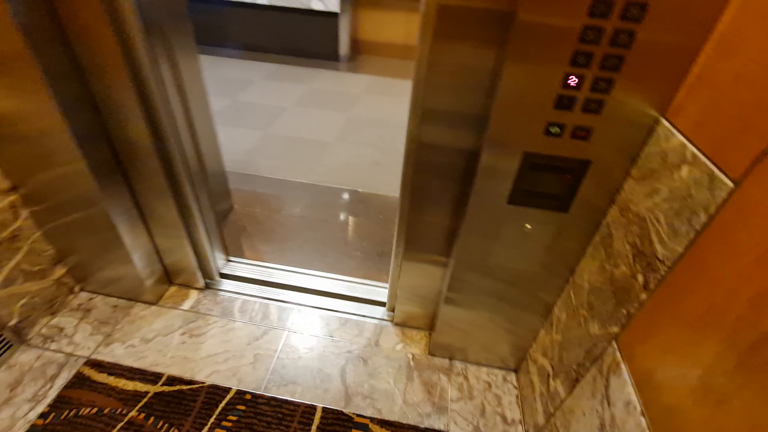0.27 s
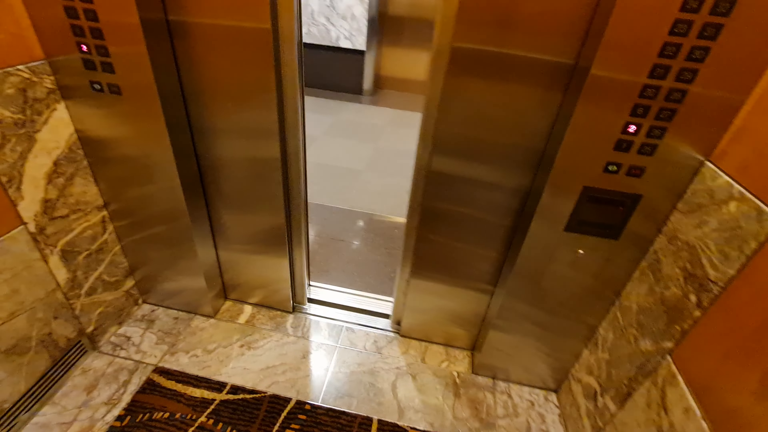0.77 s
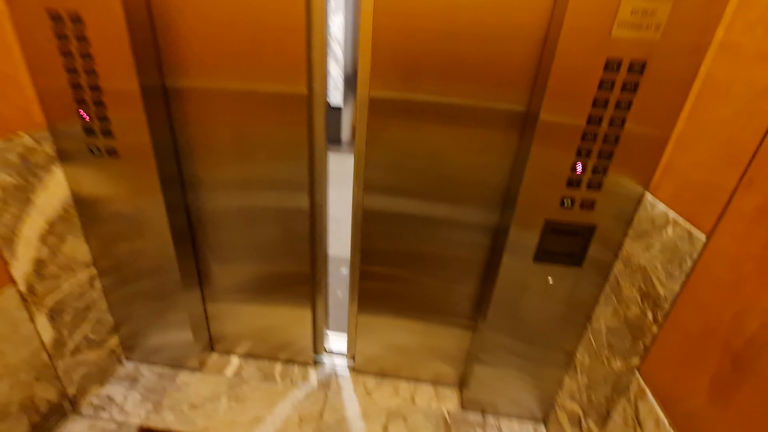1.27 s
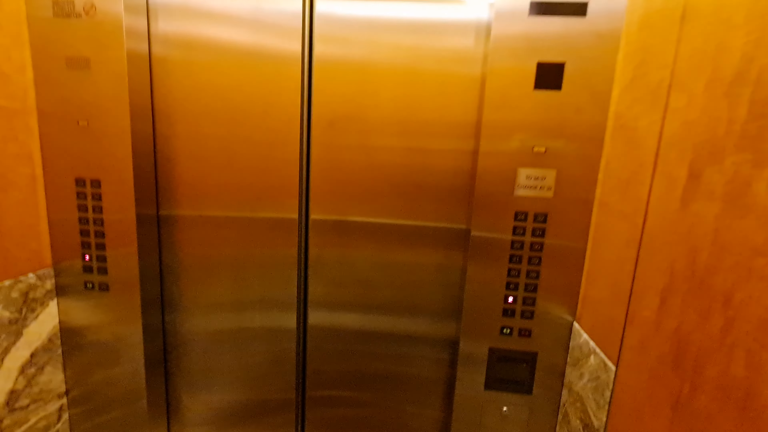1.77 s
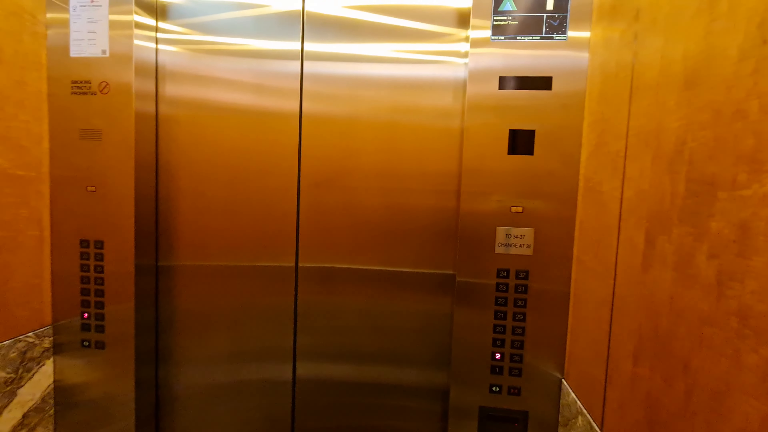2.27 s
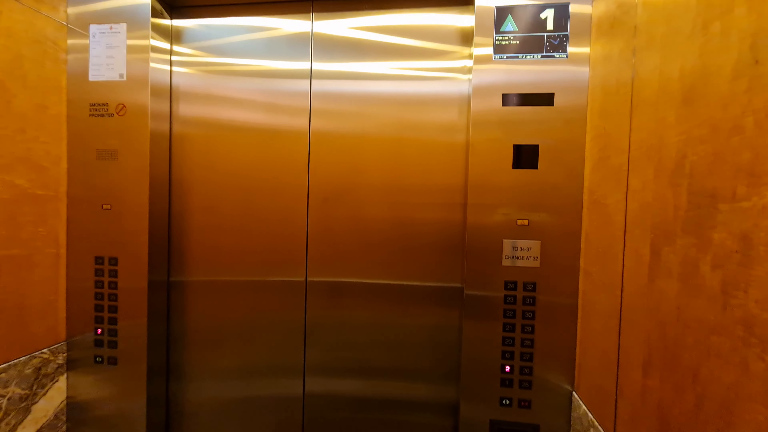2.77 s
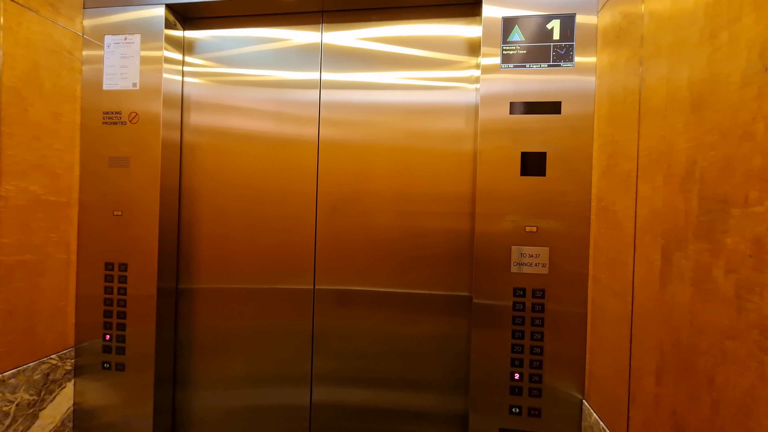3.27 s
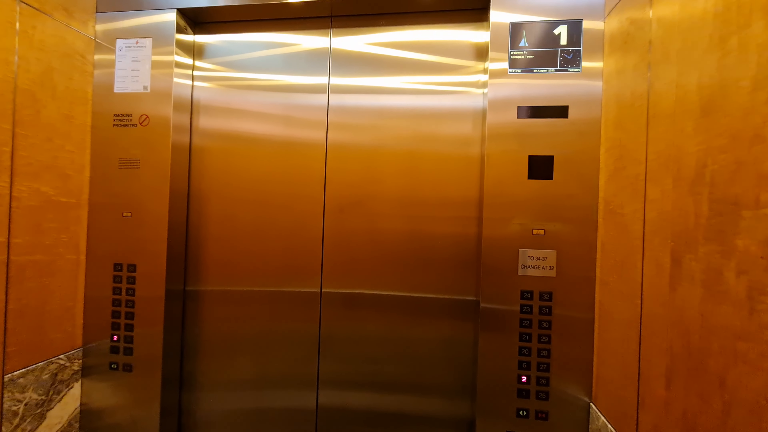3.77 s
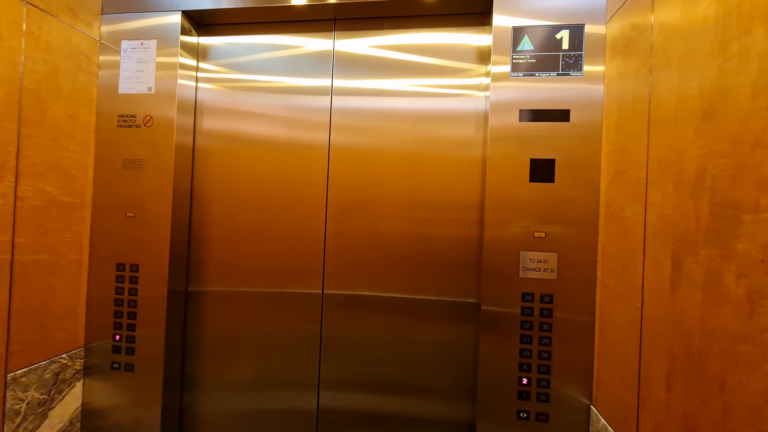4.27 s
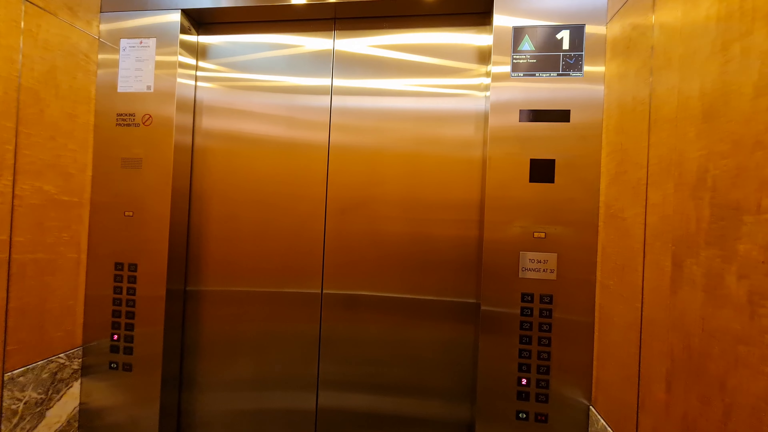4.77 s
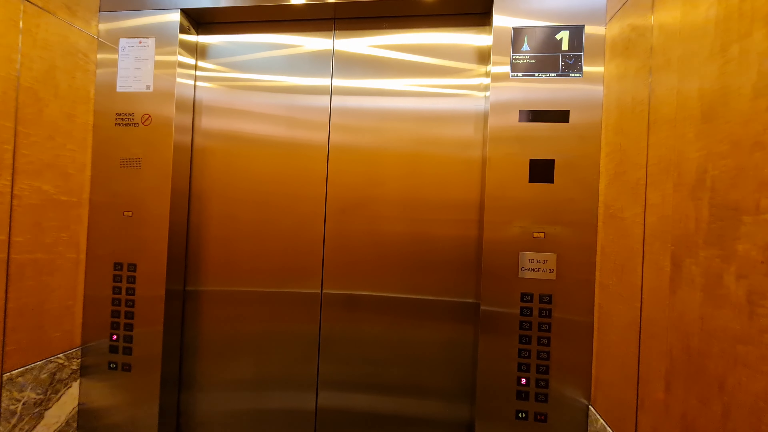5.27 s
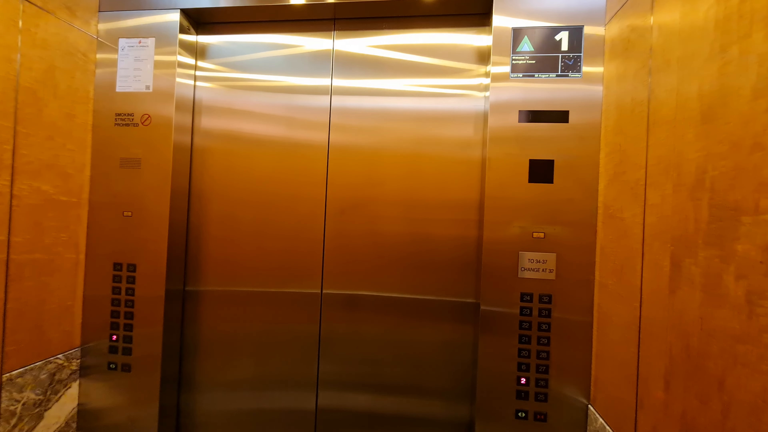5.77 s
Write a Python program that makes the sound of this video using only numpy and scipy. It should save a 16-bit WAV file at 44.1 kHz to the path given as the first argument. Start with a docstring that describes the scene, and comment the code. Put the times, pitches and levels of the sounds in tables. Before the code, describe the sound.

Inside an elevator car, steel doors roll and scrape shut with groans and a sharp tick, over a deep steady hum and airy rumble.

```python
"""Inside an elevator car: the steel doors slide shut and the car sets off, under a deep mains hum and the rush of air.
Sines make the hum, the motor whine and the inverter whistle; shaped noise makes the rumble, air, hiss and thudding.
The door rollers rumble and the panels scrape, groan and squeak, above the low drone of the door drive.
Soft noise swells brush close by, and a few short pushes tick. Late on, the drive adds a faint whine."""
import sys
import numpy as np
from scipy.fft import rfft, irfft, next_fast_len
from scipy.io import wavfile
from scipy.ndimage import map_coordinates

SR = 44100
rng = np.random.default_rng(int(sys.argv[2]) if len(sys.argv) > 2 else 0)


def wav_record(signal):
    """Record a signal, one row per channel, as 16-bit PCM in the file named by sys.argv[1]."""
    frames = np.transpose(np.atleast_2d(signal))
    bounded = np.clip(frames, -1, 1)
    # unit amplitude maps onto the largest positive 16-bit level
    quanta = np.round(bounded * 32767).astype(np.int16)
    wavfile.write(sys.argv[1], SR, quanta)


N = 264952


def amp(db):
    """Logarithmic level: decibels to amplitude gain."""
    return 10 ** (np.asarray(db) / 20)


def unit(x):
    """Power normalization: scale to rms 1."""
    return x / np.sqrt(np.mean(x ** 2) + 1e-20)


def clock():
    """Uniform sampling: the time of every sample in seconds."""
    return np.arange(N) / SR


def along(points, hz):
    """Logarithmic frequency scale: interpolate (frequency, value) points along it."""
    f, v = np.transpose(points)
    return np.interp(np.log(hz + 1), np.log(f + 1), v)


def curves(rows):
    """Linear interpolation: one curve over time for each column after the first."""
    s, *cols = np.transpose(rows)
    return [np.interp(clock(), s, c) for c in cols]


def wobble(rate):
    """Slow random modulation: a smooth curve through `rate` random knots a second."""
    knots = rng.standard_normal(int(N * rate / SR) + 4)
    return map_coordinates(knots, [clock() * rate])


def filtered(x, response):
    """Linear filtering: multiply the spectrum by a response of frequency."""
    m = next_fast_len(N + SR // 2)
    hz = np.fft.rfftfreq(m, 1 / SR)
    return irfft(rfft(x, m) * response(hz), m)[..., :N]


def panned(balance_db):
    """Interaural level difference: left and right gains, positive toward the left."""
    return amp(np.array([balance_db, -balance_db]).reshape(2, -1) / 2)


def gate(start, end, rise, fall):
    """Linear envelope: rise from the start, hold until the end, then fall; all in seconds."""
    t = clock()
    return np.clip((t - start) / rise, 0, 1) * np.clip(1 - (t - end) / fall, 0, 1)


def noise(colour):
    """Partial coherence: coloured stereo noise of rms 1 whose channels agree only in the bass."""
    # channel correlation against frequency: frequency_hz, correlation (-1 to 1)
    coherence = [(30, .88), (140, .93), (250, .5), (400, .08), (650, -.2), (1000, -.33), (1600, -.4),
                 (2600, -.05), (8000, -.03)]

    def response(hz):
        # shares of mid and side that give the wanted correlation at constant power
        turn = np.arccos(np.clip(along(coherence, hz), -1, 1)) / 2
        return amp(colour(hz)) * [np.cos(turn), np.sin(turn)]

    mid, side = filtered(rng.standard_normal((2, N)), response)
    return unit(np.array([mid + side, mid - side]))


def octave_band(hz, centre_hz, octaves):
    """Constant relative bandwidth: a bell in dB, down 4 dB at `octaves` from the centre."""
    return -4 * (np.log2((hz + 1) / centre_hz) / octaves) ** 2


def cabin(hz):
    """Room modes: the lift or dip in dB that standing waves between the walls give."""
    # standing-wave peaks and dips: centre_hz, width_hz, lift_db
    modes = [(164, 34, 4.5), (187, 19, 1), (213, 28, 2.5), (296, 48, -3.5), (315, 10, 5.5), (339, 44, 3),
             (426, 58, 6), (524, 11, -1), (533.6, 28, 6), (547, 20, -2.5), (715, 11, 5), (792, 33, 3),
             (996, 30, -12), (1015, 54, 6.5)]
    return sum(db / (1 + (2 * (hz - centre) / width) ** 2) for centre, width, db in modes)


def panel(hz):
    """Modal resonance: the response of a door panel in dB, its modes summed in power."""
    # ringing modes of the steel panel: centre_hz, width_hz, level_db
    panel_modes = [(307, 17, -1), (370, 38, 0), (448, 9, 6.5), (443, 7.7, 5.5), (547, 20, 1.5)]
    power = sum(amp(db) ** 2 / (1 + (2 * (hz - centre) / width) ** 2)
                for centre, width, db in panel_modes)
    return 10 * np.log10(power)


def swell(s, length, db, centre_hz, octaves, body=lambda hz: 0, tail_db=-120):
    """Friction noise: a band that rises, falls and may trail off, coloured by the body rubbed."""
    tail_decay_s = .09
    band = noise(lambda hz: body(hz) + octave_band(hz, centre_hz, octaves))
    t = clock() - s
    bell = np.exp(-.5 * (t / length) ** 2)
    tail = amp(tail_db) * (t > 0) * np.exp(-np.abs(t) / tail_decay_s)
    return band * amp(db) * np.maximum(bell, tail)


def hum():
    """Magnetic hum: a pure tone at twice the mains frequency, varying along a standing wave."""
    # course of the hum, before a slight wobble: time_s, level_db, left_minus_right_db
    hum_course = [(0.03, -23.5, -3), (0.37, -23, -3.5), (0.99, -26.5, -7.0), (2.14, -20, -3.0),
                  (3.05, -20, -3.5), (3.81, -22.5, -4), (5.01, -22, -4), (5.9, -22.5, -4.5)]
    hum_hz = 100.14
    db, balance_db = curves(hum_course)
    tone = unit(np.sin(2 * np.pi * hum_hz * clock()))
    return tone * amp(db + 0.2 * wobble(15)) * panned(balance_db)


def ride():
    """Broadband excitation: the shell rumbles while moving air fills the car's resonances."""
    # spectrum of the rumbling shell: frequency_hz, relative_density_db
    rumble_spectrum = [(15, -20.5), (30, -5), (55, -1.5), (75, 0), (130, 2), (190, -16.5), (300, -21.5),
                       (600, -57), (1200, -120)]
    # spectrum of the moving air, before the standing waves: frequency_hz, relative_density_db
    air_spectrum = [(60, -20.5), (130, 2.5), (190, -1.5), (250, -0.5), (400, -5), (600, -4.5), (780, -10.5),
                    (1000, -15), (1300, -18.5), (1750, -17), (2100, -25), (2700, -27.5), (4000, -41),
                    (9000, -68)]
    rumble_db, air_db = -40.5, -41  # mean levels before panning
    rumble = noise(lambda hz: along(rumble_spectrum, hz)) * amp(rumble_db + 0.18 * wobble(9.1))
    air = noise(lambda hz: along(air_spectrum, hz) + cabin(hz)) * amp(air_db + 0.52 * wobble(10))
    return rumble * panned(-5.0) + air * panned(-0.92)


def shudder():
    """Low-frequency band noise: spells of very deep thudding."""
    # spells of thudding, levels before panning: start_s, end_s, level_db
    spells = [(0, 1.1, -43), (1.55, 2.35, -46), (5.0, 5.997, -45)]
    centre_hz, ramp_s = 31, 0.22
    thud = noise(lambda hz: -12 * np.log2((hz + 1) / centre_hz) ** 2)
    level = sum(amp(db) * gate(start, end, ramp_s, ramp_s) for start, end, db in spells)
    return thud * level * panned(-1.1)


def hiss():
    """Exponential decay: a thin hiss, its treble on the right, dying down as the doors close."""
    # spectrum of the hiss, before the stereo tilt: frequency_hz, relative_density_db
    fizz_spectrum = [(800, -41.5), (2000, 2.5), (3000, 0.5), (4500, 2.5), (6200, -0.5), (7500, -7.5),
                     (8600, -11.5), (9500, -24), (12000, -18), (16000, -27)]
    open_db, shut_db = -56.5, -69.5  # first level and the one it sinks toward, before the tilt
    decline_s, settle_s = 1.37, 2.18  # onset and time constant of the decline
    leak = np.exp(-np.maximum(clock() - decline_s, 0) / settle_s)
    db = shut_db + (open_db - shut_db) * leak
    fizz = noise(lambda hz: along(fizz_spectrum, hz))
    tilted = filtered(fizz, lambda hz: panned(along([(2500, 1.5), (4500, -7.0)], hz)))
    return tilted * amp(db + .4 * wobble(30))


def whine():
    """Amplitude and phase modulation: wavering motor tones swell and fade twice."""
    # motor tones, levels before the surges: pitch_hz, level_db
    motor_tones = [(602, -65), (638, -54.5), (801, -59)]
    # swells of the motor: start_s, end_s, gain_db
    surges = [(4.17, 4.72, -2), (4.915, 5.22, 0)]
    ramp_s, waver_db = .17, 6.5

    def tone(hz):
        wavering = amp(waver_db * wobble(13))
        return unit(wavering * np.sin(2 * np.pi * hz * clock() + 0.94 * wobble(11)))

    def spread(hz):
        # one tone in both channels, plus a separately wavering copy in each
        return tone(hz) + 0.51 * np.array([tone(hz), tone(hz)])

    load = sum(amp(db) * gate(start, end, ramp_s, ramp_s) for start, end, db in surges)
    return load * sum(amp(db) * spread(hz) for hz, db in motor_tones)


def inverter():
    """Switching tone with mains sidebands: a thin whistle, strongest while the drive starts the car."""
    # switching tone and sidebands: pitch_hz, relative_level_db
    sidebands = [(5951, -2), (6051, 0), (6151, -4)]
    on_s, pull_s, ramp_s = 3.6, .8, 0.12  # switch-on time, length of the hard pull, ramps
    pull_db, cruise_db = -77, -82  # levels before panning
    whistle = sum(amp(db + 1.8 * wobble(6.7)) * np.sin(2 * np.pi * hz * clock() + .7 * wobble(30))
                  for hz, db in sidebands)
    on = gate(on_s, N / SR, ramp_s, ramp_s)
    pulling = gate(on_s, on_s + pull_s, ramp_s, ramp_s)
    level = amp(cruise_db + (pull_db - cruise_db) * pulling)
    return unit(whistle) * on * level * panned(-3.5)


def brushes():
    """Granular friction: soft brushing close by, left of centre except in the treble."""
    # brushes, levels before grain and stereo tilt: peak_s, half_length_s, level_db, centre_hz, width_octaves
    strokes = [(0.043, 0.065, -52, 3290, 1), (0.555, 0.15, -61, 6450, 1), (0.873, .035, -52.5, 3410, 0.78),
               (1.034, 0.017, -56.5, 4420, 0.6), (1.251, .045, -50, 2790, .88),
               (1.403, .02, -45, 1160, .65), (1.403, .035, -53, 3690, 0.69), (2.058, .06, -57, 3200, 0.8),
               (2.181, .025, -47, 2004, .9), (2.37, .06, -61.5, 2200, .3), (2.481, .025, -55.5, 4880, 0.43),
               (3.369, .057, -63, 3400, 0.65), (4.146, .025, -60.5, 2450, 0.13)]
    tail_db, grain_db = -8.5, 1.5  # trailing level relative to the peak; depth of the grain
    smooth = sum(swell(*row, tail_db=tail_db) for row in strokes)
    grainy = smooth * amp(grain_db * wobble(250))
    return filtered(grainy, lambda hz: panned(along([(2500, 2.9), (5000, -0.12)], hz)))


def ticks():
    """Impulsive excitation: short rounded pushes on the right, weak and opposite in sign on the left."""
    # taps, peaks before the bass is cut: start_s, peak_db, brightness_hz
    taps = [(1.029, -34.5, 14000), (1.038, -33, 12000), (1.091, -11, 3630), (1.4246, -22.5, 9800)]
    pushes = np.zeros(N)
    for s, db, hz in taps:
        u = np.maximum(clock() - s, 0) * np.pi * hz
        pushes += amp(db) * (u * np.exp(1 - u)) ** 2  # peaks at u = 1
    pushes = filtered(pushes, lambda hz: 1j * hz / (1j * hz + 300))  # first-order high-pass
    return np.array([-amp(-14.5) * pushes, pushes])


def door_motor():
    """Resonant coupling: a low drone from the door drive on the roof, shaped by the car's modes."""
    drone_db, centre_hz, width_octaves = -46.5, 222, 0.52  # level before panning
    off_s = 2.9  # the doors are home
    drone = noise(lambda hz: cabin(hz) + octave_band(hz, centre_hz, width_octaves))
    return drone * amp(drone_db) * gate(0, off_s, 0.12, 0.44) * panned(-1.2)


def doors():
    """Rolling and sliding friction: one effort drives rollers and scrape; panels groan and squeak."""
    # the doors run, brake, are pushed home and creep shut: time_s, effort_db (0 = full)
    motion = [(0, 0.5), (.55, -1.5), (1.15, -7), (1.4, -4.5), (1.75, -19), (2.2, -11.5), (3.0, -41)]
    # rollers on the rail, before the standing waves: frequency_hz, relative_density_db
    roller_spectrum = [(60, -27), (150, -5.5), (300, 3), (450, -4.5), (600, -1), (1000, -19.5),
                       (3000, -61.5)]
    # scrape in the sill: frequency_hz, relative_density_db
    track_spectrum = [(300, -21), (800, 5), (1700, 2), (2200, -4), (2900, -2), (3800, -11.5), (7000, -23),
                      (11000, -23.5), (16000, -28)]
    # rubbing panels, before their resonance colours the band: peak_s, half_length_s, level_db, centre_hz
    groan_rows = [(.41, 0.093, -42, 390), (.55, .11, -43.5, 510), (0.73, 0.061, -41, 420),
                  (1.49, 0.15, -44, 320)]
    # faint squeaks from the track: peak_s, half_length_s, level_db, centre_hz
    squeak_rows = [(1.0, .1, -55, 2920), (1.65, 0.029, -57, 1840)]
    roller_db, scrape_db = -43.5, -49.5  # at full effort, scrape before panning
    scrape_growth = 0.57  # dB of scrape per dB of effort
    groan_octaves, squeak_octaves = .28, 0.1

    effort_db, = curves(motion)
    rollers = noise(lambda hz: along(roller_spectrum, hz) + cabin(hz))
    rollers = rollers * amp(roller_db + effort_db + 1.8 * wobble(27))
    scrape = noise(lambda hz: along(track_spectrum, hz))
    scrape = scrape * amp(scrape_db + scrape_growth * effort_db + 1.8 * wobble(25))
    groans = sum(swell(*row, groan_octaves, panel) for row in groan_rows)
    squeaks = sum(swell(*row, squeak_octaves) for row in squeak_rows)
    return rollers + scrape * panned(-.5) + groans + squeaks


def scene():
    """Superposition: the sounds of the car, the close sounds and the doors add."""
    car = hum() + ride() + shudder() + hiss() + whine() + inverter()
    return car + brushes() + ticks() + door_motor() + doors()


def record(dry):
    """Band limitation: an ideal low-pass keeps nothing from its limit upward."""
    top_hz = 15800
    return filtered(dry, lambda hz: hz < top_hz)


dry = scene()
out = record(dry)
wav_record(out)
```